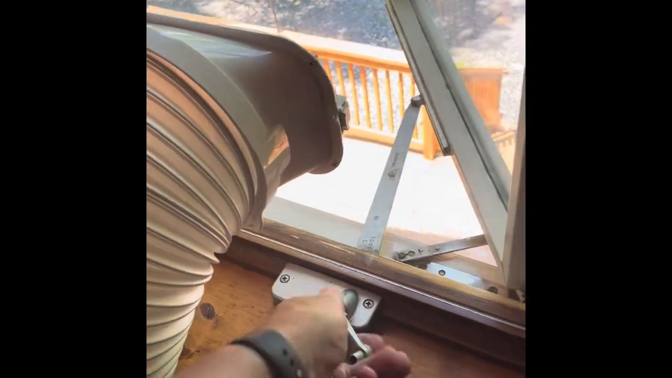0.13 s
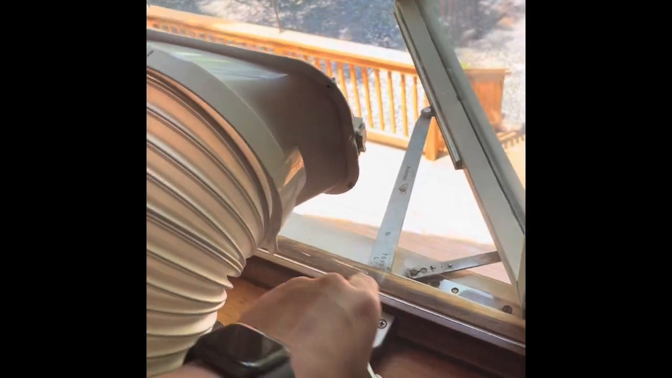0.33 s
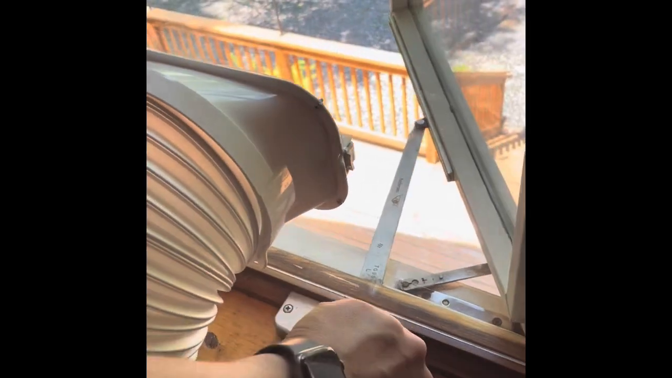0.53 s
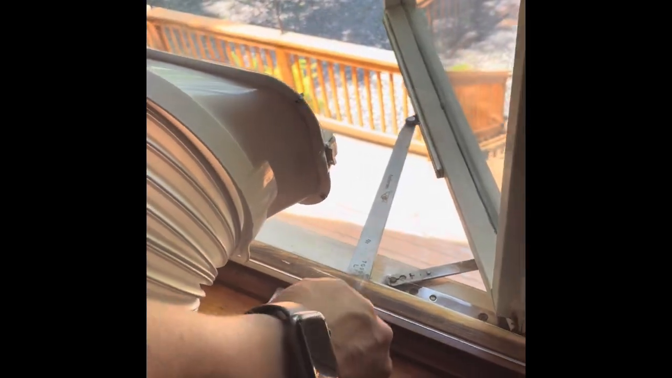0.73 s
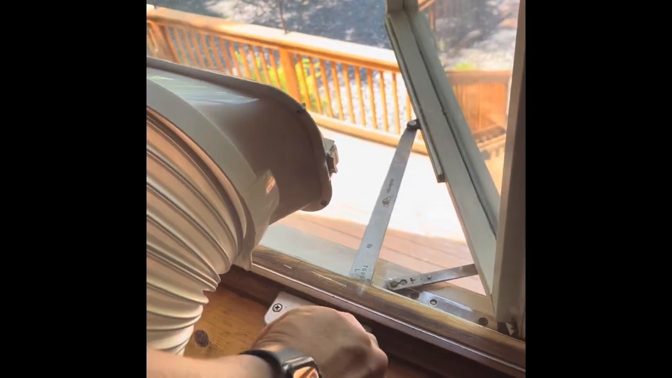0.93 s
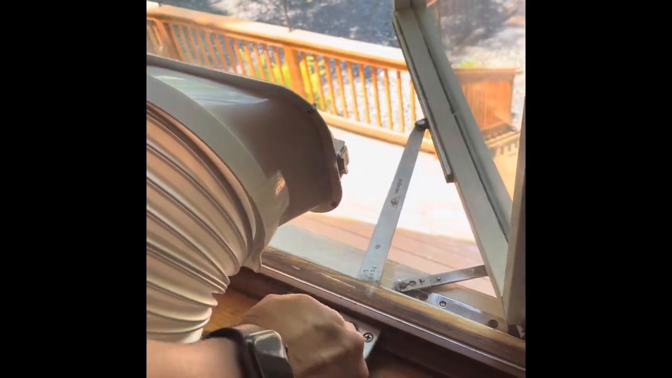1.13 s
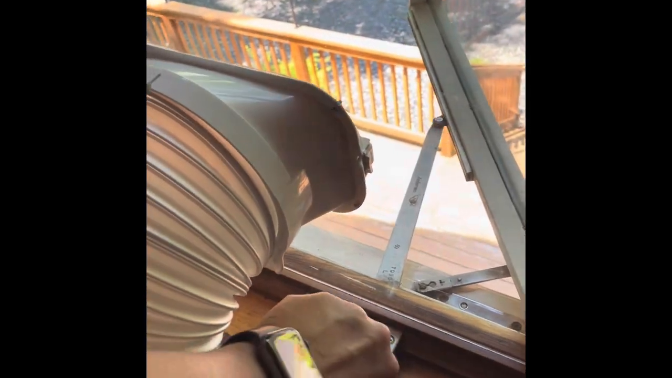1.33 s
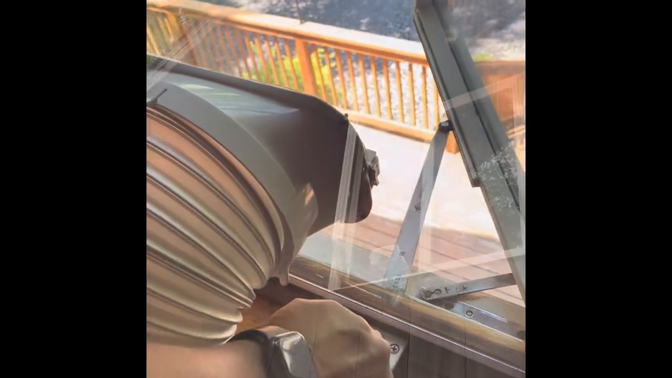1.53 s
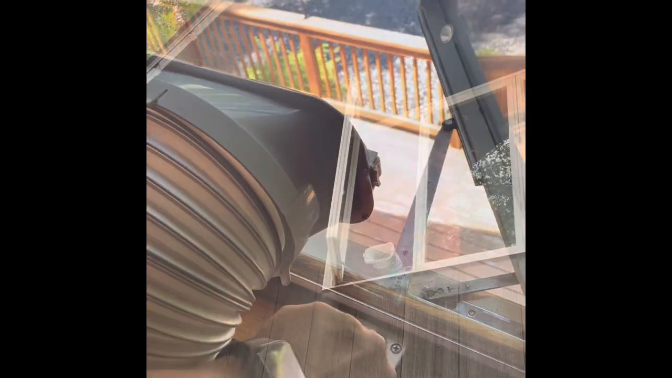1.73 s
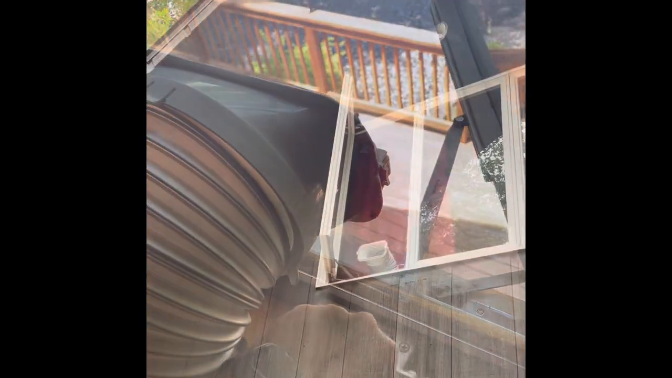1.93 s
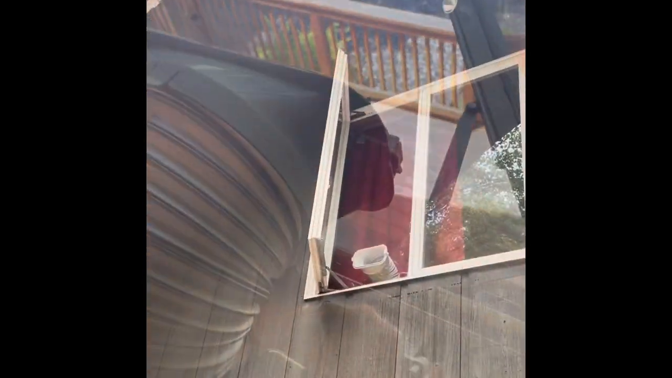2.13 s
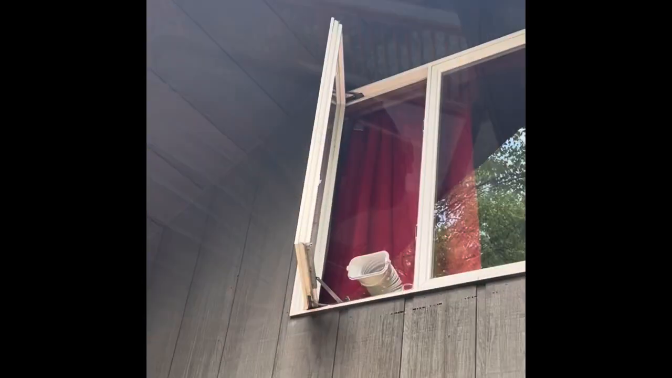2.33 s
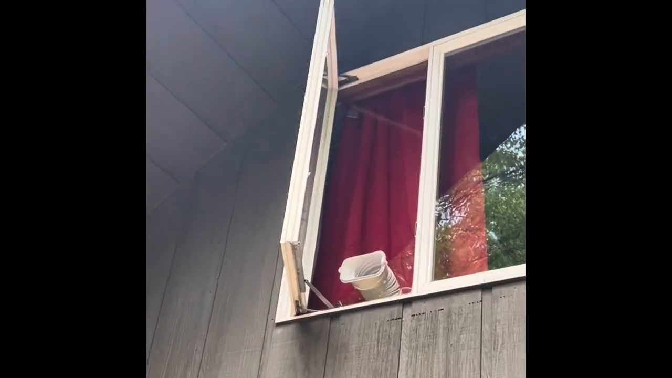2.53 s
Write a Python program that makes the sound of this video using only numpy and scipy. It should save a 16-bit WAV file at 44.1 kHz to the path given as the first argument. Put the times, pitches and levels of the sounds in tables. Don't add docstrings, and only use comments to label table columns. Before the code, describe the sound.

A casement window crank is wound by hand, close up in a small quiet room. Gritty grinding and loose ticks lead to a sharp metallic slam at 0.23 seconds, then hollow rattling knocks, strongest near 0.56. By 1.0 the clatter ends. Faint taps, dull palm bumps and short dry slides follow, busiest from 1.5 to 2.1, as a low distant motor hum slowly grows over soft rumble.

```python
import sys
import numpy as np
from scipy import signal
from scipy.fft import rfft, irfft, next_fast_len
from scipy.io import wavfile

SR = 44100
rng = np.random.default_rng(int(sys.argv[2]) if len(sys.argv) > 2 else 0)


def volts_from_decibels(level):
    exponent = np.asarray(level, float) / 20
    return 10 ** exponent


def unload_wav(signal):
    wavfile.write(
        sys.argv[1],
        SR,
        np.round(np.clip(np.atleast_2d(signal).T, -1, 1) * 32767).astype(np.int16),
    )


N = 114660
TIME_S = np.arange(N) / SR
IMPACT_SPREAD_DB = 4

# start in seconds, casing tick in dB, frame thump in dB, steel in dB.
KNOCK_EVENTS = [(0.077, -56.5, -65, -75.5), (0.111, -53.5, -37, -65.5), (0.1331, -48, -28, -61.5),
                (0.1698, -39.5, -35, -52), (0.1979, -62, -35, -85), (0.2075, -70, -33, -82),
                (0.2335, -56, -14, -70), (0.2629, -42, -33.5, -52.5), (0.3466, -74, -30, -71),
                (0.3894, -85, -55, -64.5), (0.4612, -33, -14, -75), (0.5035, -39.5, -26, -74),
                (0.5192, -65.5, -24.5, -89), (0.5461, -41, -32, -80), (0.5582, -23, -10.5, -42),
                (0.5724, -50, -27.5, -87), (0.5947, -27.5, -15, -49.5), (0.6074, -70, -39, -78),
                (0.6874, -58, -35.5, -69), (0.7096, -41, -23.5, -67), (0.7235, -53, -24, -86.5),
                (0.7753, -34, -34, -63), (0.8169, -80, -41.5, -85), (0.8598, -68.5, -38, -99),
                (0.8779, -54, -48, -98), (0.8901, -53.5, -18.5, -101), (0.907, -87, -34.5, -94),
                (0.9279, -85, -38, -95), (1.0098, -58, -40, -81)]
# start in seconds, casing tick in dB, frame thump in dB, steel in dB.
TAP_EVENTS = [(1.1019, -67.5, -90.5, -71.5), (1.2744, -62, -53.5, -83), (1.4102, -61, -74, -67.5),
              (1.4424, -72, -48.5, -86.5), (1.51, -44.5, -36, -52), (1.8113, -51, -55.5, -52),
              (1.8422, -58.5, -68, -58.5), (1.8816, -43, -39, -74), (1.9864, -92, -80, -68.5),
              (2.0462, -51.5, -45.5, -83), (2.0654, -59, -47.5, -74), (2.2583, -64.5, -56.5, -97),
              (2.2797, -52, -46, -82.5), (2.3116, -51, -27.5, -76), (2.3511, -62, -82.5, -72.5)]


def crank():
    start_s, casing_db, frame_db, steel_db = np.transpose(list(KNOCK_EVENTS) + list(TAP_EVENTS))
    force = effort()
    wood = frame(start_s + 0.002, frame_db - 2, teeth(force))
    ticks = casing(start_s, casing_db - 7) + steel_arm(start_s, steel_db - 5.5)
    ticks = ticks + cracks(start_s, casing_db - 9, tail_s=.01, order=2)
    metal = filtered(ticks + arm_slam(), 2, 515, "high")
    return wood, metal + snaps(), grit(force)


# frequency in Hz, level in dB, t60 in seconds.
FRAME_MODES = [(310, -24, 0.12), (363.3, -14.5, 0.04), (409, 0.5, 0.03), (454.3, -4.5, .032),
               (486.4, -7, 0.025), (674.3, -10.5, 0.028), (806, -8, 0.017)]


def frame(start_s, db, teeth_clicks):
    out = 0
    for hz, level_db, t60_s in FRAME_MODES:
        clicks = teeth_clicks.copy()
        spread_db = IMPACT_SPREAD_DB * rng.uniform(-1, 1, len(start_s))
        clicks[(start_s * SR).astype(int)] += volts_from_decibels(db + spread_db)
        out = out + volts_from_decibels(level_db) * swell(clicks, hz, t60_s, rise_t60_s=0.026)
    return filtered(out, 4, 308, "high")


# frequency in Hz, level in dB, t60 in seconds.
CASING_MODES = [(851, 0, .03), (1096, 1, .02), (1460, -3, .018), (1861, -4, .015), (2289, -2, .013),
                (2690, -5, .016), (3438, -7, .008)]


def casing(start_s, db):
    return struck(CASING_MODES, start_s, db, chatter_s=0.0035, loose=True)


# frequency in Hz, level in dB, t60 in seconds.
STEEL_MODES = [(4240, 0, .011), (4766, 0, .012), (5300, 3, .009), (5943, 7, .011), (6820, -2.5, .009)]


def steel_arm(start_s, db):
    return struck(STEEL_MODES, start_s, db, chatter_s=0.0035, loose=True)


# frequency in Hz, level in dB, t60 in seconds.
SLAM_MODES = [(690, -7.5, 0.093), (736, -2, 0.058), (1180, -11.5, 0.035), (1566, -9.5, 0.047),
              (1830, -9.5, 0.063), (2320, 3.5, 0.031), (3020, -17.5, 0.061), (3530, -14.5, 0.026),
              (4600, -16, 0.015), (5790, -5, 0.01), (6450, -12.5, 0.014), (9320, -5, 0.0028),
              (10860, -6, 0.0023), (12600, -17.5, 0.006)]


def arm_slam():
    slam_s = .2292
    rings = struck(SLAM_MODES, [slam_s], [-14.5], chatter_s=0.0021, loose=False)
    return rings + cracks([slam_s], [-20.5], tail_s=0.046, order=1)


def cracks(start_s, db, tail_s, order):
    length = 4000
    out, t = np.zeros(N + length), np.arange(length) / SR
    shape = np.exp(-t / 0.00081) + volts_from_decibels(-18) * np.exp(-t / tail_s)
    for at_s, hit_db in zip(start_s, db):
        first = int(at_s * SR)
        out[first:first + length] += volts_from_decibels(hit_db) * shape * rng.standard_normal(length)
    return filtered(out[:N], order, (700, 3500), "band")


# time in seconds, level in dB.
EFFORT_CURVE = [(0, -59), (0.08, -56), (.13, -53.5), (.22, -44.5), (.3, -61.5), (.37, -58), (.44, -51),
                (0.551, -54.5), (.65, -52), (.75, -60.5), (0.952, -65), (1.101, -86.5), (1.6, -70),
                (1.85, -56), (2.1, -82.5), (2.3, -78), (2.4, -68), (2.6, -78)]


def effort():
    return volts_from_decibels(np.interp(TIME_S, *np.transpose(EFFORT_CURVE)))


def grains(count, per_s):
    sizes = volts_from_decibels(2.5 * np.minimum(rng.exponential(1, (count, N)), 4))
    signs = rng.choice([-1, 1], (count, N))
    return sizes * signs * (rng.random((count, N)) < per_s / SR)


def teeth(force):
    return force * grains(1, per_s=240)[0]


# frequency in Hz, level in dB per Hz.
GRIT_SPECTRUM = [(150, -52), (500, -3.5), (1000, -3), (2500, -10.5), (5000, -21), (7500, -28.5),
                 (10500, -25), (13000, -38.5)]


def grit(force):
    source = grains(4, per_s=6700).reshape(2, 2, N)
    source = source * [[1], [.5]] + 1e-18
    lurch = volts_from_decibels(-11 + 3.5 * drift(9))
    return force * lurch * banded(lambda hz: at_hz(GRIT_SPECTRUM, hz), 3.3, source)


# start in seconds, level in dB.
SNAP_EVENTS = [(0.0945, -54.5), (0.1115, -55), (0.1326, -55), (0.1465, -61.5), (0.1697, -56),
               (0.5606, -54.5), (0.595, -62), (1.02, -57), (1.1571, -56), (1.4102, -70), (1.512, -69.5),
               (1.525, -51.5), (1.6596, -59.5), (1.9869, -64), (2.1465, -59.5)]


def snaps():
    length = 400
    out, t = np.zeros(N), np.arange(length) / SR
    for start_s, db in SNAP_EVENTS:
        first = int(start_s * SR)
        out[first:first + length] = volts_from_decibels(db) * rng.standard_normal(length) * np.exp(-t / 0.0014)
    return filtered(out, 2, 4500, "high")


# start in seconds, level in dB, pitch in Hz.
BUMP_EVENTS = [(0.086, -35.5, 242), (0.251, -36, 70.4), (0.612, -34, 156), (0.916, -33, 285),
               (1.13, -58, 150), (1.283, -38, 202), (1.296, -37.5, 128), (1.531, -38.5, 197),
               (1.677, -32, 232), (1.701, -34, 199), (1.741, -41, 119), (1.921, -39, 57),
               (2.055, -36.5, 66)]


def bumps():
    cycles = 6
    out = np.zeros(N)
    for start_s, db, hz in BUMP_EVENTS:
        click = np.zeros(N)
        click[int(start_s * SR)] = volts_from_decibels(db)
        out += swell(click, hz, cycles / hz, 0.38 * cycles / hz)
    return out


# start in seconds, length in seconds, level in dB, brightest frequency in Hz, half width in octaves.
SLIDE_EVENTS = [(0.96, 0.029, -84, 10500, .3), (1.005, .04, -77.5, 10500, .3), (1.005, .04, -81.5, 2860, 1),
                (1.16, 0.073, -77, 4500, 0.43), (1.245, 0.06, -70, 4600, 0.36),
                (1.506, 0.048, -68.5, 4500, 0.27), (1.415, 0.11, -73.5, 690, 0.32),
                (1.615, 0.21, -72.5, 4290, 0.62), (1.672, 0.13, -64, 4800, 0.54),
                (1.672, 0.14, -66.5, 2680, .35), (1.79, 0.049, -57, 500, 0.11),
                (1.788, .04, -71, 1390, 0.077), (2.3, .042, -57, 2830, 0.1),
                (1.786, 0.061, -59.5, 4630, 0.27), (1.838, 0.036, -57.5, 2930, 0.36),
                (1.838, .038, -60.5, 5000, 0.19), (1.885, 0.15, -72, 3300, 0.7),
                (2.035, 0.039, -69.5, 440, 0.84)]


def slides():
    out = np.zeros((2, N))
    for start_s, length_s, db, hz, octaves in SLIDE_EVENTS:
        left, right, common = rng.standard_normal((3, N))
        white = np.array([left, right]) + common
        band = filtered(white, 2, [hz * 2 ** -octaves, hz * 2 ** octaves], "band")
        progress = np.clip((TIME_S - start_s) / length_s, 0, 1)
        stroke = np.sqrt(np.abs(np.sin(np.pi * progress ** 0.54)))
        air = volts_from_decibels(-18) * white * (hz > 4000)
        out += volts_from_decibels(db + 3 * drift(89)) * stroke * (rms_one(band) + air)
    return out


# frequency in Hz, level in dB.
HUM_LINES = [(88, -58), (145, -59), (218, -69), (289, -70.5)]


def hum():
    lines = 0
    for hz, db in HUM_LINES:
        height = volts_from_decibels(db + 3.5 + drift(5.5))
        lines = lines + height * np.sin(2 * np.pi * hz * TIME_S + 0.95 * drift(1.5))
    return lines * outdoor_share() ** 1.33


def outdoor_share():
    from_s, full_s = 1.1, 2.22
    return np.clip((TIME_S - from_s) / (full_s - from_s), 0, 1)


# frequency in Hz, level in dB.
ROOM_SPECTRUM = [(15, -34.5), (30, -10), (58, -0.5), (125, -7), (200, -15.5), (400, -35), (1300, -51),
                 (13400, -53.5)]
# frequency in Hz, level in dB.
OUTDOOR_SPECTRUM = [(15, -43), (25, -12.5), (64, -0.5), (157, -13.5), (205, -11.5), (1810, -44.5),
                    (2550, -43.5), (13400, -62)]


def background():
    share, white = outdoor_share(), rng.standard_normal((2, 2, N + 8000))

    def spectrum_db(hz):
        return (1 - share) * at_hz(ROOM_SPECTRUM, hz) + share * at_hz(OUTDOOR_SPECTRUM, hz)
    return volts_from_decibels(-55.5) * banded(spectrum_db, 0.99, white)


def room(x):
    t60_s, wall_cut_hz = 0.2, 4600
    size = next_fast_len(N + SR)
    w = np.arange(size // 2 + 1) * 2 * np.pi / size
    out = np.zeros((2, size // 2 + 1), complex)
    for k, lag in enumerate(rng.uniform(.004, .022, 12) * SR):
        wall = 1 / (1 + 1j * w * SR / (2 * np.pi * wall_cut_hz)) ** 2
        echo = volts_from_decibels(-60 * lag / SR / t60_s) * np.exp(-1j * w * int(lag)) * wall
        out[k % 2] += echo / (1 - echo) * (-1) ** (k // 2)
    return irfft(out * rfft(x, size), size)[:, :N]


def struck(modes, start_s, db, chatter_s, loose):
    length, chatter_length = 4000, 400
    out, t = np.zeros(N + length), np.arange(length) / SR
    hz, level_db, t60_s = np.transpose(modes)[:, :, None]
    for at_s, hit_db in zip(start_s, db):
        off, spread = loose * rng.uniform(-0.82, 1, (2, len(modes), 1))
        chatter = rng.standard_normal((len(modes), chatter_length)) * np.exp(-t[:chatter_length] / chatter_s)
        tones = volts_from_decibels(-60 * t / t60_s) * np.sin(2 * np.pi * hz * (1 + .07 * off) * t)
        rings = signal.fftconvolve(tones, chatter, axes=1)[:, :length]
        peak = np.max(np.abs(rings), axis=1, keepdims=True)
        height = volts_from_decibels(hit_db + level_db + IMPACT_SPREAD_DB * spread) / peak
        first = int(at_s * SR)
        out[first:first + length] += np.sum(rings * height, axis=0)
    return out[:N]


def ring(clicks, hz, t60_s):
    r, w = volts_from_decibels(-60 / (t60_s * SR)), 2 * np.pi * hz / SR
    return signal.lfilter([0, np.sin(w)], [1, -2 * r * np.cos(w), r * r], clicks + 1e-18)


def swell(clicks, hz, t60_s, rise_t60_s):
    driver = ring(clicks, hz, rise_t60_s)
    return ring(driver, hz, t60_s) * 2 * np.log(1000) / (rise_t60_s * SR)


# frequency in Hz, correlation from -1 to 1.
EAR_LIKENESS = [(60, 1), (200, 0.93), (400, 0.24), (1000, 0.49), (6000, 0.14), (12000, 0.088)]


def banded(spectrum_db, patchy_db, source):
    out, edges = 0, 22 * 2 ** np.arange(0, 9.6, .5)
    for k, (low, high) in enumerate(zip(edges, edges[1:])):
        mid, side = filtered(source[k % 2], 2, [low, high], "band")[:, -N:]
        hz = np.sqrt(low * high)
        alike = np.clip(at_hz(EAR_LIKENESS, hz), -1, 1)
        pair = np.sqrt(1 + alike) * mid + np.sqrt(1 - alike) * side * [[1], [-1]]
        out = out + volts_from_decibels(spectrum_db(hz) + patchy_db * drift(17)) * pair
    return rms_one(out)


def place(x, pan_db):
    hz = np.arange(N // 2 + 1) / N * SR
    lean = volts_from_decibels(pan_db / 2 / (1 + (hz / 1674) ** 2))
    turn_rad = 1.55 * hz ** 2 / (hz ** 2 + 2600 ** 2)
    return irfft(rfft(x) * np.array([lean, np.exp(-1j * turn_rad) / lean]), N)


def drift(rate_hz):
    step, settle = 40, 2000
    r = np.exp(-2 * np.pi * rate_hz * step / SR)
    white = rng.standard_normal(N // step + settle + 2)
    slow = signal.lfilter([1], [1, -2 * r, r * r], white)[settle:]
    return np.interp(np.arange(N) / step, np.arange(len(slow)), rms_one(slow))


def filtered(x, order, hz, kind):
    return signal.sosfilt(signal.butter(order, hz, kind, fs=SR, output="sos"), x)


def rms_one(x):
    return x / np.sqrt(np.mean(x ** 2) + 1e-20)


def at_hz(points, hz):
    table_hz, value = np.transpose(points)
    return np.interp(np.log(hz), np.log(table_hz), value)


def scene():
    wood, metal, grinding = crank()
    near = place(wood, 3.5) + place(metal, 7) + grinding
    hand = place(bumps(), 0.99) + slides()
    return near + volts_from_decibels(-21) * room(wood + metal) + hand + background() + hum()


def top_cut(x):
    return signal.sosfilt(signal.butter(12, 13500, fs=SR, output="sos"), x)


def record(dry):
    dip_share = .89
    dipped = filtered(dry, 2, (6900, 8700), "bandstop")
    mix = (1 - dip_share) * dry + dip_share * dipped
    mix = filtered(mix, 4, 13200, "low")
    return top_cut(mix)


dry = scene()
out = record(dry)
unload_wav(out)
```